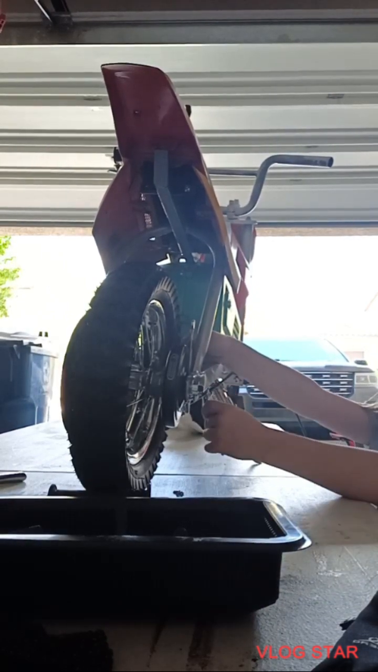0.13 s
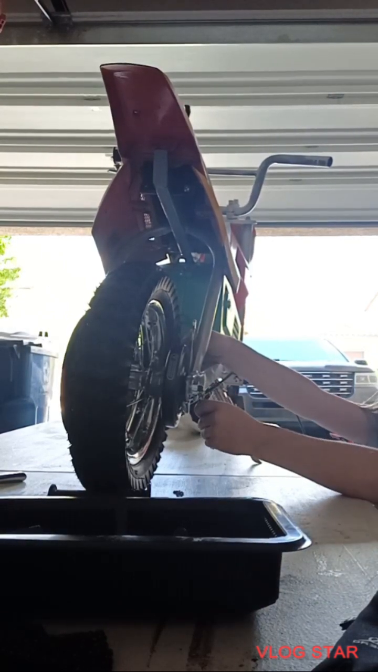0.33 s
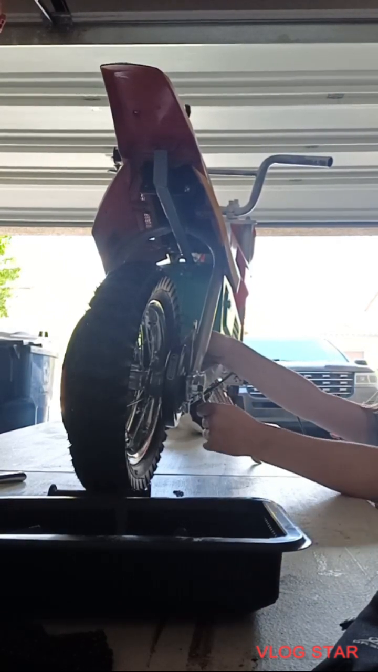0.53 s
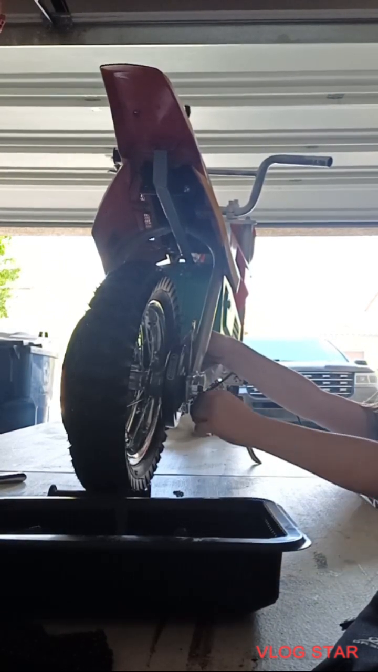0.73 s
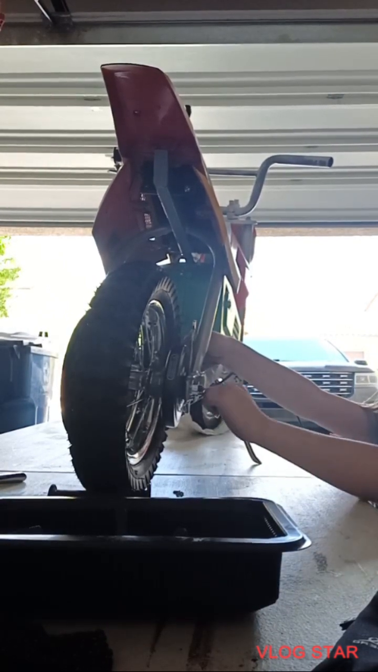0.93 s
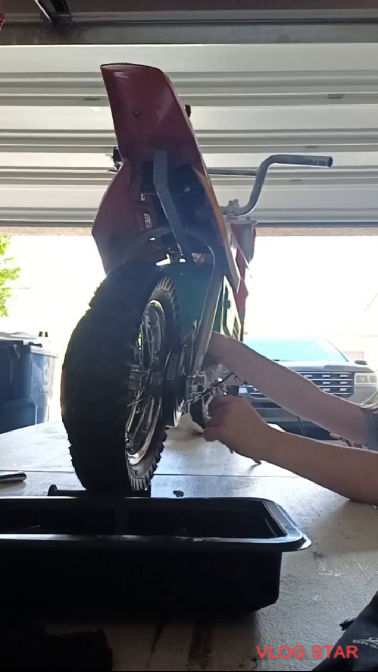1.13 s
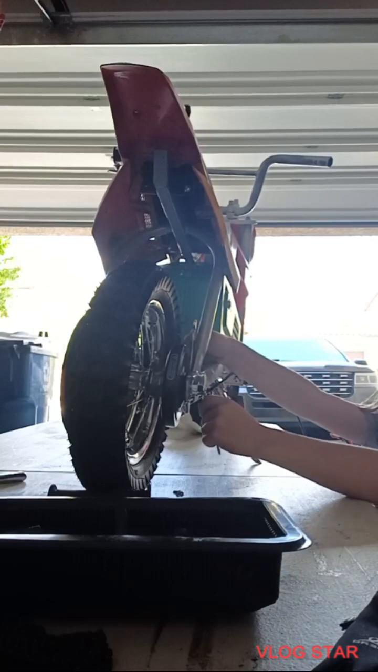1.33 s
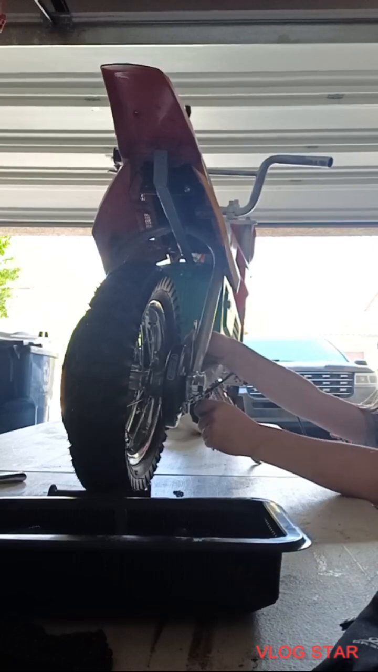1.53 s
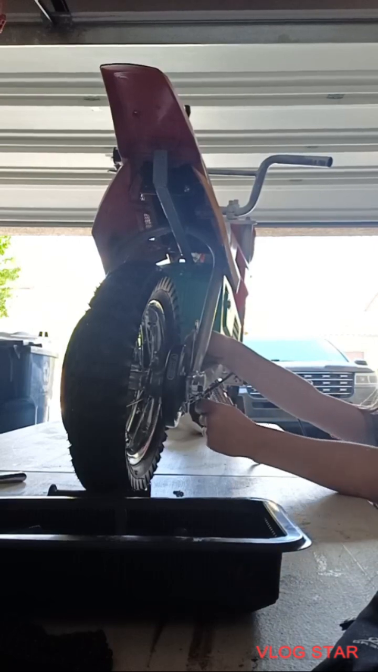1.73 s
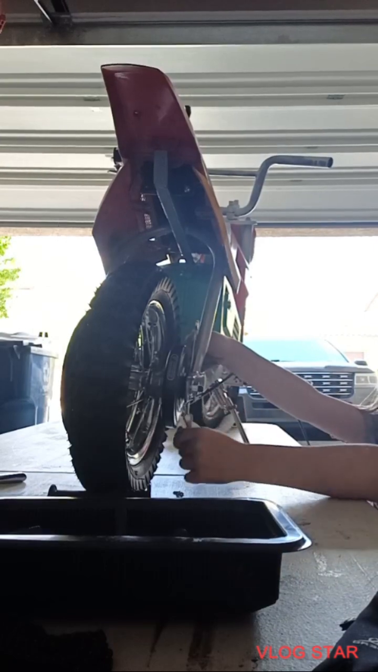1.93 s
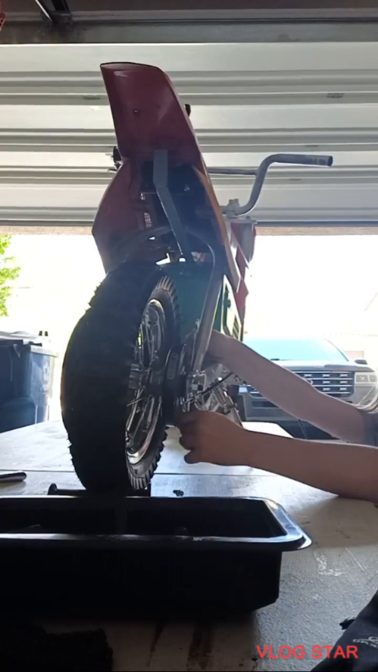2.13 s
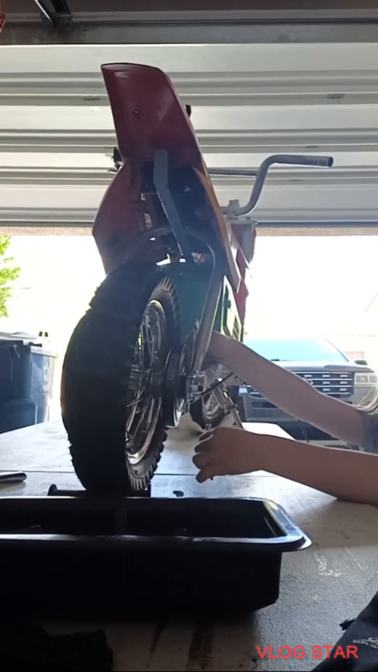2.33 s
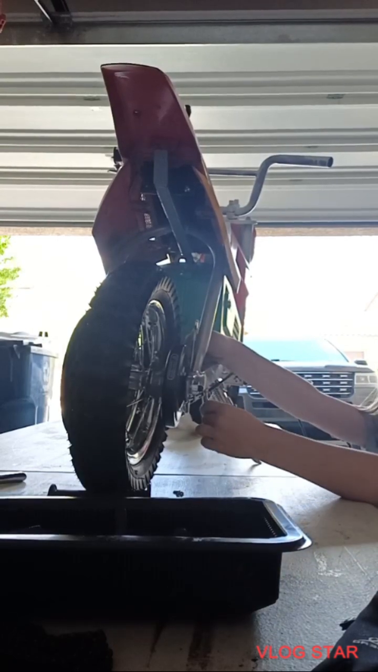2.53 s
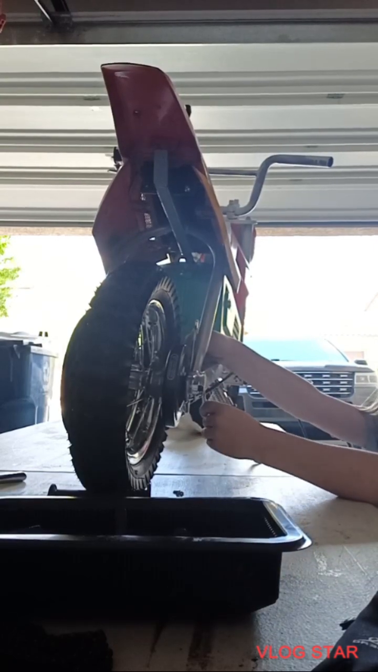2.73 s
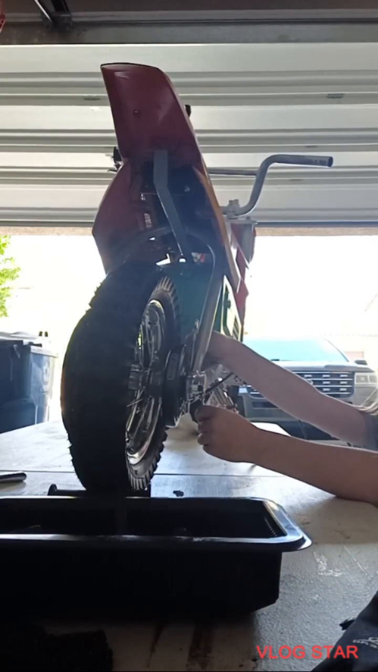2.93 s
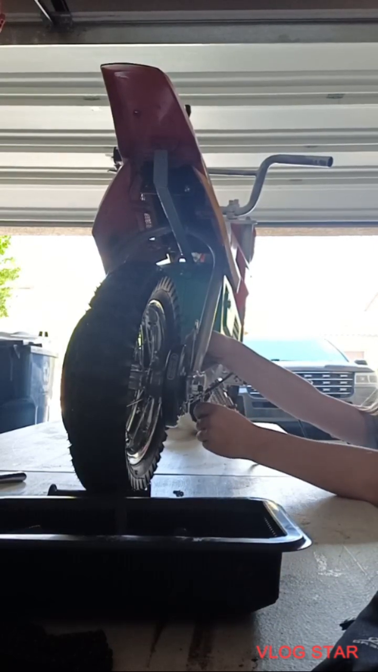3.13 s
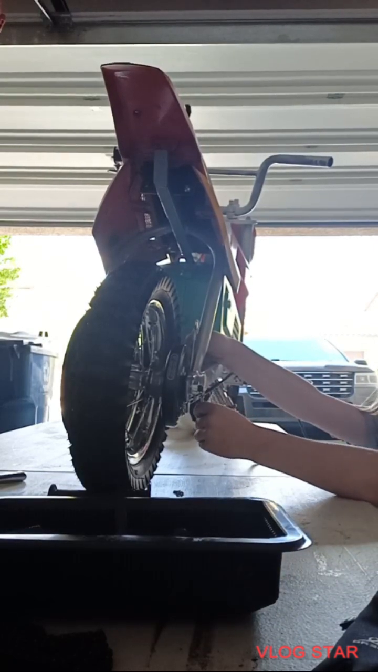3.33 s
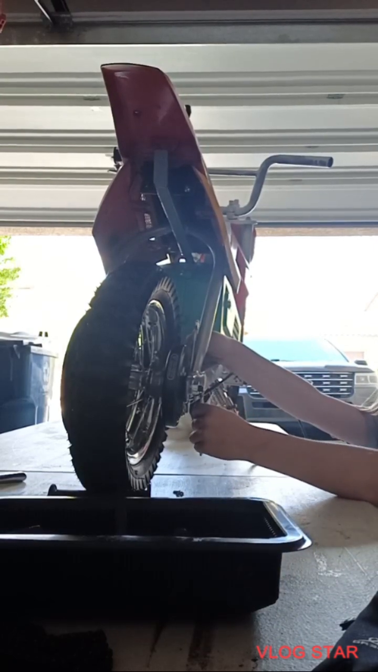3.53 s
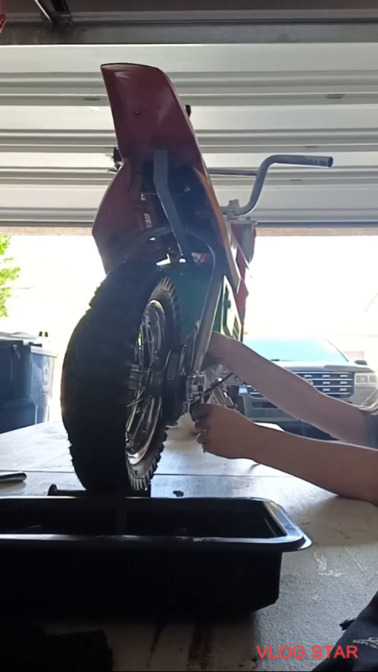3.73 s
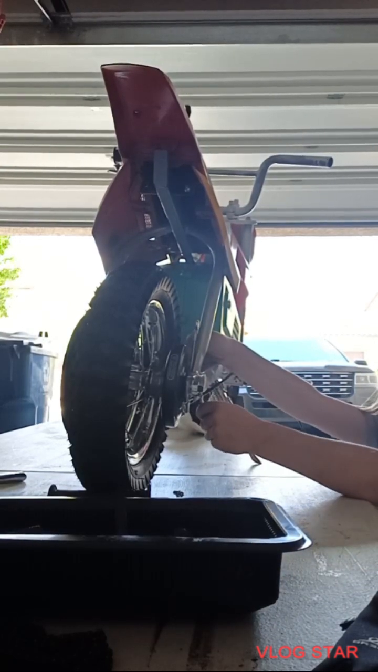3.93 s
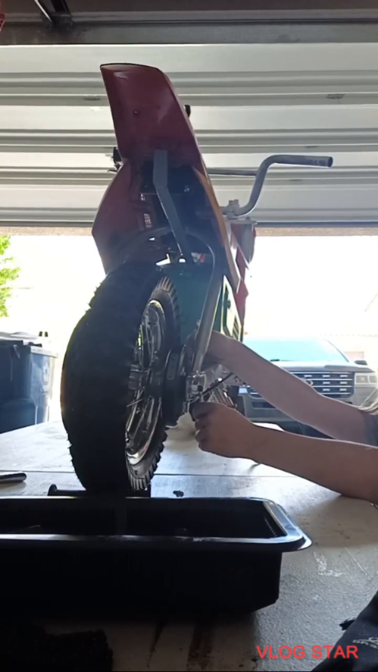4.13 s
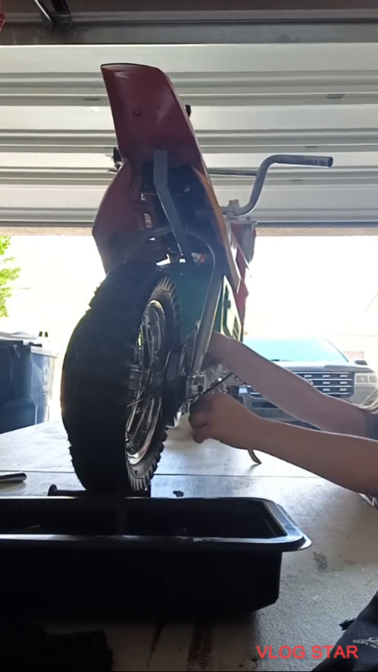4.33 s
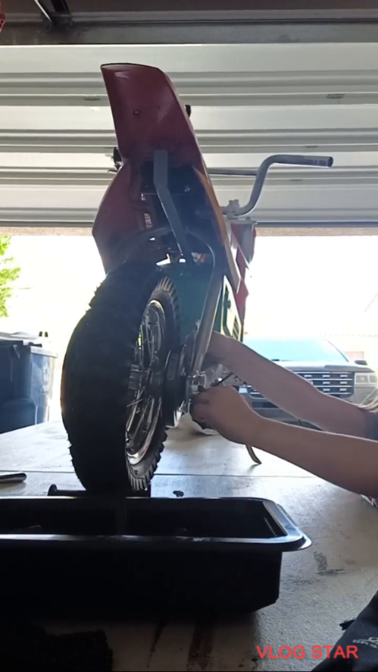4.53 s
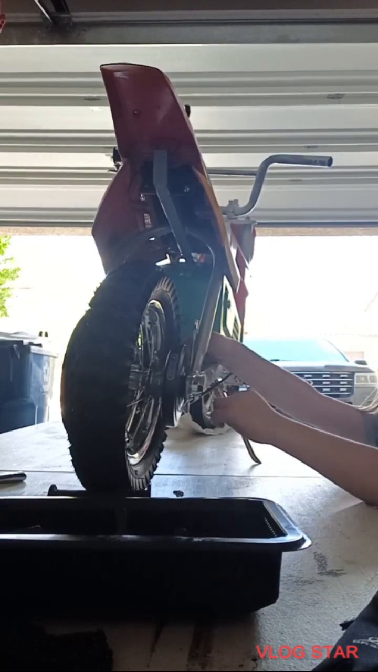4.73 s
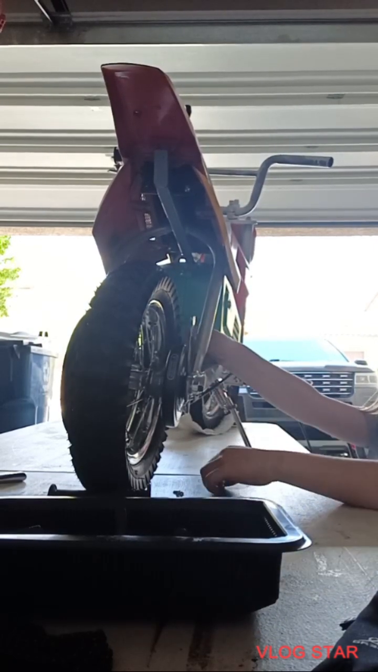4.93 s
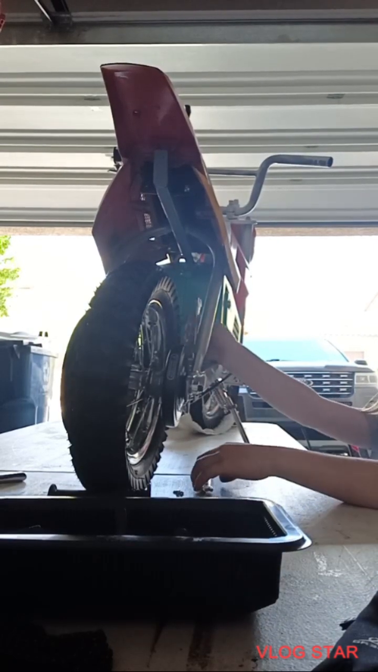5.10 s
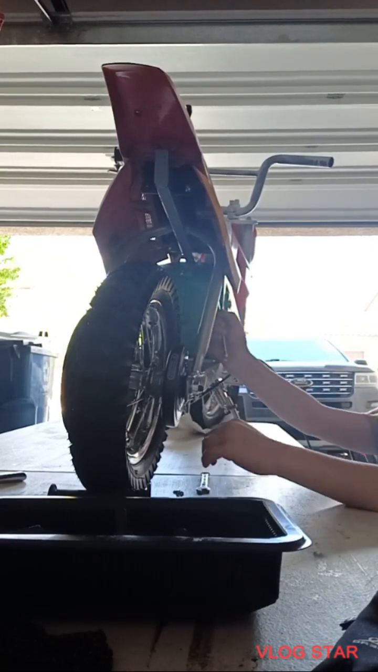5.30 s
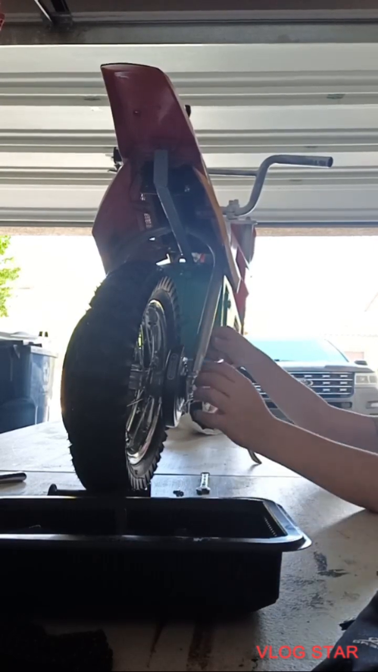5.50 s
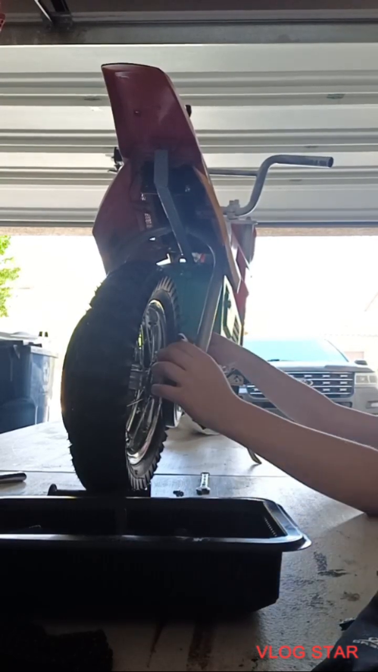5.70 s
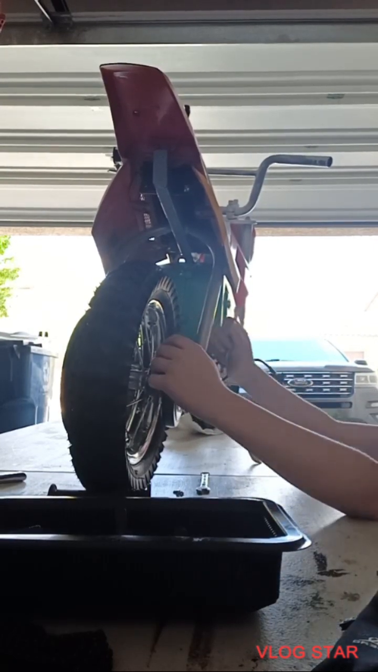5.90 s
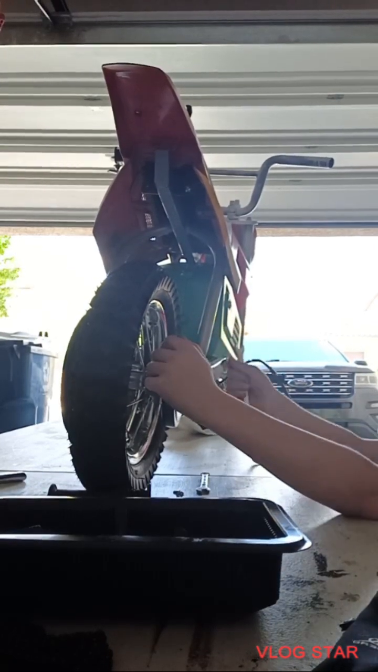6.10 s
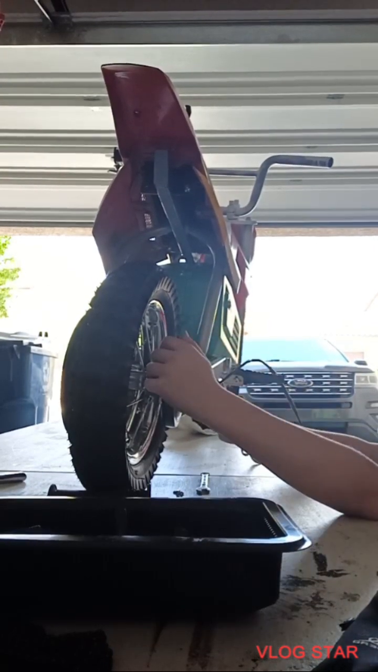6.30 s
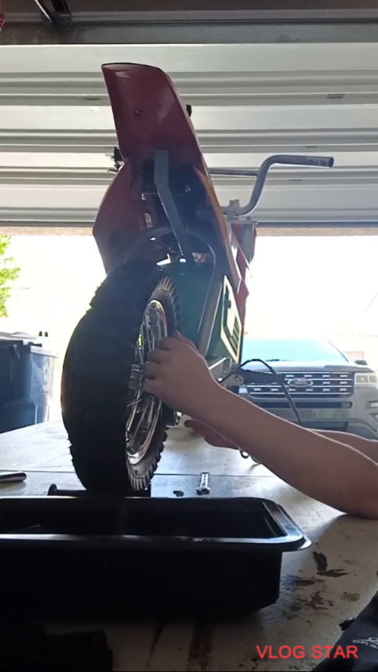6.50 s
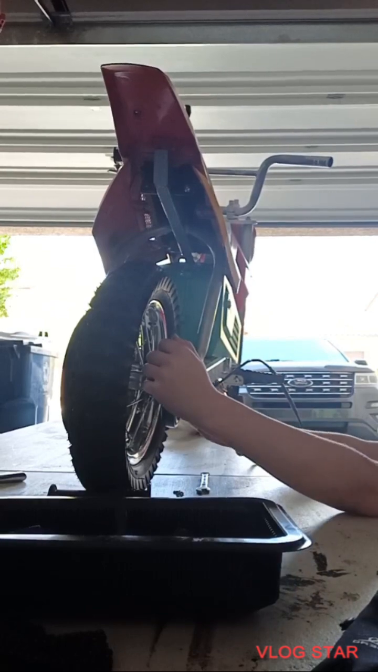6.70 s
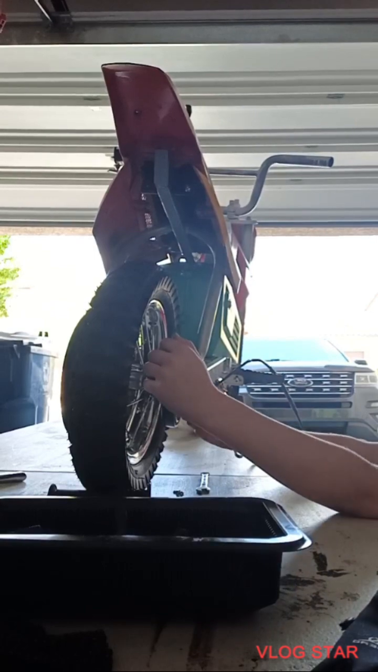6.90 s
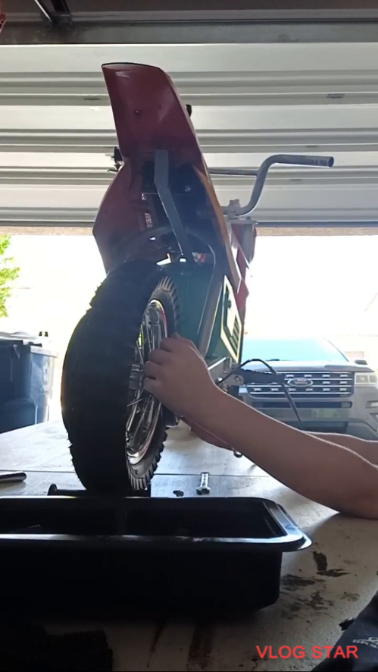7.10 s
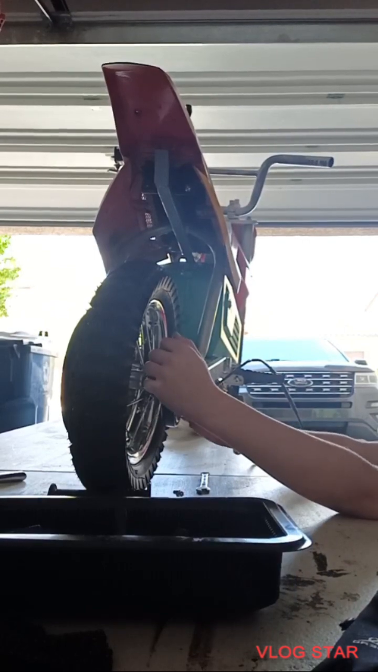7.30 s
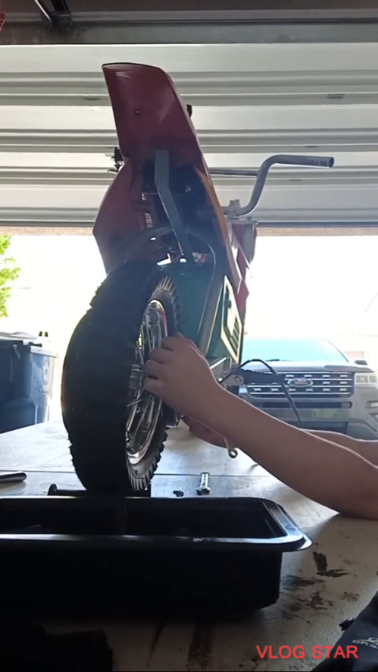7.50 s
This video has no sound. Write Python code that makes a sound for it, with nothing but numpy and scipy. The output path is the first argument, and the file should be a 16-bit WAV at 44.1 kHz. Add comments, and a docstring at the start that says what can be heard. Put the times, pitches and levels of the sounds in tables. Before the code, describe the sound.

Close, crisp tool sounds with short garage reflections: irregular steel clicks and hollow knocks for nearly five seconds, then a nut knocking and rocking on a platform, a clear high washer clink, soft sliding of hands and a few dull, very quiet bumps from the bike frame. Behind it, a faint low motor hum dies away and a soft outside murmur remains under thin hiss. The work sits slightly right.

```python
"""Wrench work on a small dirt bike

A wrench clicks and clinks on a rear axle nut in an open garage: short noise cracks plus decaying steel tones.
The nut is set down and rocks to rest on a platform, a washer clinks, then the nudged bike bumps dully. Their
tones and noise bursts get quick echoes and a room tail. Hands rub over the parts, and the nut scrapes as it is
set down, as uneven, shaped hiss. A far motor, a wavering sine, hums and fades over filtered-noise murmur from
outside and a thin hiss."""
import sys
import numpy as np
from scipy import signal
from scipy.fft import rfft, irfft, next_fast_len
from scipy.io import wavfile

SR = 44100
rng = np.random.default_rng(int(sys.argv[2]) if len(sys.argv) > 2 else 0)


def master(y):
    """Save y as 16-bit WAV."""
    cut = np.clip(np.atleast_2d(y).T, -1, 1)
    pcm = np.round(cut * 32767)  # scale
    wavfile.write(sys.argv[1], SR, pcm.astype(np.int16))


N = 332955
TIME = np.arange(N) / SR
HIT = TIME[:SR // 4]   # the time axis of one blow
AXLE_LEFT_DB = -4.7   # left channel relative to right, for blows at the axle
# colour of a steel contact: pitch_hz [Hz], level_db [dB]
STEEL = [(200, -27.5), (450, -15.5), (950, -10), (1700, -11), (2700, -6.5), (4900, -10.5), (6400, -5.5),
         (8000, 2), (9500, -3), (11000, -10.5), (13000, -17), (15000, -10.5), (16000, -23)]


def from_db(db):
    """Turn decibels into a gain."""
    return 10 ** (np.asarray(db) / 20)


def unit_energy(x):
    """Scale each channel so its squared samples sum to 1."""
    return x / np.sqrt(np.sum(x ** 2, axis=-1, keepdims=True) + 1e-20)


def at_hz(points, hz):
    """Read a table between its points; equal pitch ratios count as equal steps."""
    f, value = np.transpose(points)
    return np.interp(np.log(np.maximum(hz, 1)), np.log(f), value)


def add(track, s, sound):
    """Mix a sound into a track at a time in seconds."""
    start = round(s * SR)
    track[..., start:start + sound.shape[-1]] += sound[..., :N - start]


def cut(x, hz, kind, order=2):
    """Remove the sound above ("low") or below ("high") a frequency, with a Butterworth filter."""
    sos = signal.butter(order, min(hz, .45 * SR), kind, fs=SR, output="sos")
    return signal.sosfilt(sos, x)


def colour(x, gain_db):
    """Filter by a dB curve over frequency, with no sound ahead of its cause (minimum phase)."""
    size = 2 * next_fast_len(x.shape[-1])
    hz = np.arange(size // 2 + 1) * SR / size
    cepstrum = irfft(np.log(from_db(gain_db(hz))))
    # folding the second half onto the first makes the filter causal
    cepstrum[1:size // 2] *= 2
    cepstrum[size // 2 + 1:] = 0
    response = np.exp(rfft(cepstrum))
    return irfft(rfft(x, size) * response)[..., :x.shape[-1]]


def noise(spectrum, side_db):
    """Steady stereo noise of a given colour, rms 1; more side sound makes it wider."""
    white = rng.standard_normal((2, N))
    mid, side = colour(white, lambda hz: at_hz(spectrum, hz))
    stereo = mid + from_db(side_db) * side * [[1], [-1]]
    return np.sqrt(N) * unit_energy(stereo)


def pan(left_db):
    """Channel gains for a left-right difference, keeping the total power."""
    return np.sqrt(2) * unit_energy(from_db(np.array([left_db, 0])))[:, None]


def ring(modes, scatter_db, detune=0):
    """A struck object's dying tones; every blow varies their levels and, by the share detune, their pitches."""
    hz, db, t60 = np.transpose(modes)[:, :, None]
    weight, shift = rng.standard_normal((2, *hz.shape))
    level = from_db(db + scatter_db * weight) * np.exp(-np.log(1000) * HIT / t60)
    tones = level * np.sin(2 * np.pi * hz * (1 + detune * shift) * HIT)
    signs = (-1) ** np.arange(len(modes))
    return signs @ tones


def chatter(decay_s, rise_s=0.0011):
    """A short noise burst, as hard faces meet; the ripple of its spectrum gives it a colour of its own."""
    evenness = .4   # share of the ripple smoothed away
    t = HIT[:SR // 20]
    envelope = (1 - np.exp(-t / rise_s)) * np.exp(-t / max(decay_s, 1e-4))
    burst = rng.standard_normal(len(t)) * envelope
    ripple_db = 20 * np.log10(np.abs(rfft(burst, 2 * len(t))) + 1e-9)
    grid_hz = np.linspace(0, SR / 2, len(ripple_db))
    burst = colour(burst, lambda hz: -evenness * np.interp(hz, grid_hz, ripple_db))
    return unit_energy(np.pad(burst, (0, len(HIT) - len(t))))


def crack(spectrum, decay_s):
    """The toneless part of a contact: coloured chatter of energy 1."""
    return unit_energy(colour(chatter(decay_s), lambda hz: at_hz(spectrum, hz)))


def scatter(x, near_db, near_s):
    """Direct sound plus quick reflections off wheel, swingarm and platform, different for each ear."""
    reflections = np.array([chatter(near_s), chatter(near_s)])
    echoes = signal.fftconvolve(x[None], reflections[:, :SR // 20], axes=-1)[:, :len(x)]
    return (x + from_db(near_db) * echoes) / np.hypot(1, from_db(near_db))


def garage(blows, left_db, near_db, near_s, tail_db, build_s=0.0056):
    """Place (s, sound) blows in the room: near reflections, then a tail that dies sooner in the treble."""
    # how long the garage rings: pitch_hz [Hz], time to fall 60 dB t60_s [s]
    garage_t60 = [(100, .55), (500, .42), (1300, .36), (3500, .34), (8000, .3), (11000, .26), (15000, .22)]
    source, near = np.zeros((1, N)), np.zeros((2, N))
    for s, sound in blows:
        add(source, s, sound)
        add(near, s, scatter(sound, near_db, near_s))
    t, tail = TIME[:SR * 2 // 3], 0
    edges_hz = np.geomspace(50, 18000, 13)
    for low, high in zip(edges_hz, edges_hz[1:]):
        sos = signal.butter(2, [low, high], "band", fs=SR, output="sos")
        band = signal.sosfilt(sos, rng.standard_normal((2, len(t))))
        t60_s = at_hz(garage_t60, np.sqrt(low * high))
        tail = tail + band * np.exp(-np.log(1000) * t / t60_s)
    response = from_db(tail_db) * unit_energy(tail * (1 - np.exp(-t / build_s)))
    reverb = signal.fftconvolve(source, response, axes=-1)[:, :N]
    return pan(left_db) * (near + reverb)


def background(hiss_db=-75, waver=.35):
    """Outdoor murmur and a far motor, wavering in level and phase, come through the door over a thin hiss."""
    # level of the far motor: time_s [s], level_db [dB]
    motor_levels = [(0, -62.5), (.55, -55), (.7, -70.5), (1.9, -73.5), (2.6, -85.5), (7.55, -96)]
    # colour of the outdoor murmur: pitch_hz [Hz], level_db [dB]
    outside_colour = [(15, -69.5), (25, -40), (72, -3.5), (171, -4), (260, -7.5), (345, -5), (389, -9.5),
                      (681, -11.5), (816, -12.5), (3000, -40), (3900, -64.5), (6600, -120)]
    # colour of the thin hiss: pitch_hz [Hz], level_db [dB]
    hiss_colour = [(500, -6.5), (2000, -4.5), (4000, -11), (6000, -12), (7300, -5.5), (8400, -5),
                   (10000, -9.5), (12000, -17), (16000, -10.5)]
    motor_hz = 116
    # the murmur starts louder and settles
    outside_db, swell_db, settle_s = -68.5, 8, 1.9

    sway = np.sqrt(N) * unit_energy(cut(rng.standard_normal((2, N)), 4.5, "low"))
    motor_gain = from_db(np.interp(TIME, *np.transpose(motor_levels))) * (1 + waver * sway[0])
    motor = np.sqrt(2) * motor_gain * np.sin(2 * np.pi * motor_hz * TIME + waver * sway[1])
    murmur_gain = from_db(outside_db + swell_db * np.exp(-TIME / settle_s))
    murmur = murmur_gain * noise(outside_colour, side_db=-14.0)
    return (motor + murmur) * pan(-0.97) + from_db(hiss_db) * noise(hiss_colour, side_db=1)


def hands(grain_db=1):
    """Sliding contact makes a fine, uneven hiss; each slide swells, holds and dies away."""
    # hands and tool slide over metal, and at 5.155 s the nut scrapes as it is set down: start_s [s], length_s
    # [s], level_db [dB]
    slides = [(0, 0.017, -58), (1.173, 0.03, -64.5), (1.43, 0.082, -64.5), (3.018, 0.17, -62),
              (4.414, .025, -72), (5.155, .025, -55.5), (5.44, 0.072, -64), (5.59, 0.044, -54.5),
              (5.867, .26, -57), (6.25, 0.095, -65), (6.684, 0.034, -63), (7.24, .05, -79)]
    # colour of skin and tool sliding on metal: pitch_hz [Hz], level_db [dB]
    slide_colour = [(200, -22), (800, -2.5), (1500, -8), (3200, -6), (5200, -11), (7000, -5), (8300, 2.5),
                    (9500, -6), (11000, -12), (15500, -11), (17000, -26.5)]
    attack_s, release_s = .015, .045

    level = 0
    for s, length_s, db in slides:
        before = np.maximum(s - TIME, 0)
        after = np.maximum(TIME - s - length_s, 0)
        level = level + from_db(db) * np.exp(-before / attack_s - after / release_s)
    # a new random unevenness every 900 samples, joined by straight lines
    knots = TIME[::900]
    grain = np.interp(TIME, knots, rng.standard_normal(len(knots)))
    return level * from_db(grain_db * grain) * noise(slide_colour, side_db=1.5) * pan(-3)


def wrench(body_hz=5200, edge_hz=11000):
    """Each contact gives a crack of its own colour, sets the wrench ringing and knocks on the swingarm."""
    # steel on steel: start_s [s], level_db [dB], bluntness body_db [dB, below body_hz],
    # edge_db [dB, above edge_hz]
    clinks = [(0.1255, 1.5, -14.5, -2), (0.131, 1, -12, -1.5), (0.3603, -7, -3, 0), (0.4175, -7, 1, -2),
              (0.6138, -7, -1.5, 3), (0.6383, -16, 5.5, 6), (0.8, -14, 2, 22), (0.8397, -12, 1.5, -15),
              (1.0237, -16.5, 0.5, 6), (1.4989, -4, -6, 4), (1.511, -7.5, -3.5, -10),
              (1.5626, -2, -0.5, -2), (1.713, -25, 7, -5), (1.7634, -22.5, 2.5, -7), (1.9372, -13, 4.5, 11),
              (1.968, 2, -1, -11), (1.9776, 0, 1, 2.5), (2.0064, -2, -1.5, -9), (2.2236, 5, -5.5, -4),
              (2.6414, 10, -6.5, -8.5), (2.7746, -17, 4.5, -31), (2.8862, -3, -7, 7), (3.038, -26, 0, -4),
              (3.073, -28, 2.5, -12), (3.1341, -12.5, -4, -8), (3.461, -25.5, -2, 0), (3.472, -6, -1.5, -3),
              (3.555, -13, 1, -9), (3.6753, -13, -1.5, -10), (3.7259, -16.5, -1, -7), (3.8984, -15, 4, 2),
              (3.9193, -11, -1.5, 0.5), (4.6828, -12, 4, 4), (4.702, 4.5, -8.5, -2),
              (5.8511, -14, -2.5, -27), (5.9947, -14.5, -9, -6.5)]
    # the wrench's tones: pitch_hz [Hz], level_db [dB], time to fall 60 dB t60_s [s]
    wrench_modes = [(1373, -9, 0.12), (2045, -13.5, 0.3), (2660, -10, .2), (3000, -20.5, 0.076),
                    (4070, -9.5, 0.15), (7030, -9.5, 0.08), (6970, -6.5, 0.04), (7170, -3.5, 0.14),
                    (8200, -17.5, 0.11), (8500, -9, 0.13), (9020, -17, 0.31), (9200, -35, .18),
                    (9700, -1.5, 0.06), (15300, -19.5, .1)]
    # the swingarm's hollow tones: pitch_hz [Hz], level_db [dB], time to fall 60 dB t60_s [s]
    swingarm_modes = [(474, -8, 0.36), (663, -8.5, 0.024), (720, -2.5, 0.074), (958.6, 1.5, 0.1),
                      (1192, 1, 0.012)]
    contact_s, hardening = .002, 0.097   # decay at 0 dB; share of a blow's dB by which it shortens
    ring_db = -12   # relative to the crack, before its colour
    # knock relative to the uncoloured crack, and dB more for each dB of bluntness
    knock_db, knock_per_bluntness = -15.5, 2.1

    blows = []
    for s, db, body_db, edge_db in clinks:
        def shelves(hz):
            """A blunt blow has more body; each blow has its own amount of bright edge."""
            body = body_db / (1 + (hz / body_hz) ** 10)
            edge = edge_db * (1 - 1 / (1 + (hz / edge_hz) ** 10))
            return body + edge

        rung = ring(wrench_modes, scatter_db=3, detune=.012)
        knock = unit_energy(cut(ring(swingarm_modes, scatter_db=2, detune=.08), 230, "high"))
        contact = crack(STEEL, contact_s * from_db(-hardening * db))
        sound = colour(contact + from_db(ring_db) * unit_energy(rung), shelves)
        # a blunt blow also knocks harder
        sound = sound + from_db(knock_db + knock_per_bluntness * body_db) * knock
        blows.append((s, from_db(db) * sound))
    return garage(blows, AXLE_LEFT_DB, near_db=11.5, near_s=0.0051, tail_db=-5.0)


def rocking(count=8):
    """Touches (s, dB) of the rocking nut: the gaps shrink and the swing runs down evenly to nothing."""
    start_s, gap_s, gap_ratio, start_db = 5.237, .0117, .96, 7.5
    k = np.arange(count)
    s = start_s + gap_s * (1 - gap_ratio ** k) / (1 - gap_ratio)
    return list(zip(s, start_db + 20 * np.log10(1 - k / count)))


def nut(travel_s=0.0034, tick_db=-19.5, tick_body_db=3):
    """Each touch ticks through the air; the slower bending wave in the platform follows as a thud."""
    # the nut is set down and drops on the platform: start_s [s], level_db [dB]
    nut_touches = [(5.067, -4.5), (5.077, 0), (5.186, 6.5), (5.2075, 13), (5.225, 12)]
    # the platform's tones: pitch_hz [Hz], level_db [dB], time to fall 60 dB t60_s [s]
    platform_modes = [(261.7, -19, 0.031), (418, -7, .03), (554, -3, .018), (710, 4, 0.007),
                      (860, -1.5, 0.02), (1044, -1.5, 0.024), (1170, -7, 0.011), (1580, -20.5, 0.035)]

    ticks, thuds = [], []
    for s, db in nut_touches + rocking():
        tick = crack(STEEL, 0.0009)
        tick = tick + from_db(tick_body_db) * cut(tick, 5000, "low")
        ticks.append((s, from_db(db + tick_db) * tick))
        wave = ring(platform_modes, scatter_db=2, detune=.04)
        thud = unit_energy(cut(cut(wave, 1600, "low", order=4), 170, "high", order=4))
        thuds.append((s + travel_s, from_db(db) * thud))
    airborne = garage(ticks, left_db=-4.0, near_db=-10.5, near_s=0.0042, tail_db=1.0)
    return airborne + garage(thuds, left_db=-17.0, near_db=-7.5, near_s=0.013, tail_db=-19)


def washer(ring_db=-4):
    """The loose washer chatters against the axle, then rings freely and clearly."""
    # the washer clinks: start_s [s], level_db [dB]
    washer_hits = [(5.6832, 7), (5.6871, 6)]
    # the washer's tones: pitch_hz [Hz], level_db [dB], time to fall 60 dB t60_s [s]
    washer_modes = [(2620, -28.5, .25), (4150, -14, .22), (4380, -19, .24), (6100, -10, 0.09),
                    (6535, -29, .25), (7500, -11, 0.15), (7500, 6, 0.13), (8360, 6.5, 0.16),
                    (7750, 0.5, .24), (8700, -8, .14), (9520, -9.5, .14), (9200, -12, 0.19),
                    (10460, -5, 0.1522), (11170, -10.5, 0.24), (11800, -15.5, 0.29), (14300, -19.5, .17),
                    (15780, -6, 0.17)]
    # colour of the washer's chatter: pitch_hz [Hz], level_db [dB]
    chatter_colour = [(500, -42.5), (1500, -27), (3200, -20), (4400, -10.5), (4900, -27.5), (5900, -13.5),
                      (6900, -13.5), (8200, 3), (10200, -7), (10900, -18), (11430, -5), (12200, -14),
                      (15200, -7.5), (17000, -23)]

    blows = []
    for s, db in washer_hits:
        rung = unit_energy(cut(ring(washer_modes, scatter_db=1), 2000, "high"))
        sound = crack(chatter_colour, 0.0024) + from_db(ring_db) * rung
        blows.append((s, from_db(db) * sound))
    return garage(blows, AXLE_LEFT_DB, near_db=10.0, near_s=0.0017, tail_db=-1.5)


def bike():
    """Soft bumps shake the heavy frame; brighter ones reach its higher tones and grind more on grit."""
    # the bike bumping on its stand: start_s [s], level_db [dB], brightness limit bright_hz [Hz]
    bumps = [(6.106, -28.5, 224), (6.117, -30, 1773), (6.127, -31, 1110), (6.141, -28, 700),
             (6.172, -35, 600), (6.208, -34, 328), (6.25, -43, 500), (6.336, -41, 302), (6.429, -51, 223)]
    # the bike's low tones: pitch_hz [Hz], level_db [dB], time to fall 60 dB t60_s [s]
    bike_modes = [(79, -9, 0.075), (102.4, -6, 0.12), (164.5, -3.5, 0.082), (256, -5.5, 0.067),
                  (390, -4.5, 0.025), (703, -5, 0.018), (960, -7.5, 0.028), (1220, -15, 0.023)]
    # grit relative to the bump at a brightness of 1 kHz, and its rise with brightness
    grit_offset_db, grit_db_per_octave = 3, 9

    thumps, grit = [], []
    for s, db, bright_hz in bumps:
        shake = ring(bike_modes, scatter_db=1.5, detune=.05)
        bump = cut(cut(shake, bright_hz, "low"), 48, "high")
        thumps.append((s, from_db(db) * bump / np.abs(bump).max()))
        grit_db = db + grit_offset_db + grit_db_per_octave * np.log2(bright_hz / 1000)
        grind = unit_energy(cut(chatter(0.0018), 920, "low", order=1))
        grit.append((s, from_db(grit_db) * grind))
    frame = garage(thumps, left_db=-5.5, near_db=-2.5, near_s=0.0087, tail_db=-11.0)
    return frame + garage(grit, left_db=-5, near_db=-3, near_s=0.0039, tail_db=-1)


def scene():
    """All sources together."""
    return background() + hands() + wrench() + nut() + washer() + bike()


def record(dry):
    """Cut the top of the treble steeply."""
    cutoff_hz = 15650
    sos = signal.ellip(10, .1, 80, cutoff_hz, fs=SR, output="sos")   # .1 dB ripple, 80 dB rejection
    return signal.sosfilt(sos, dry)


dry = scene()
out = record(dry)
master(out)
```